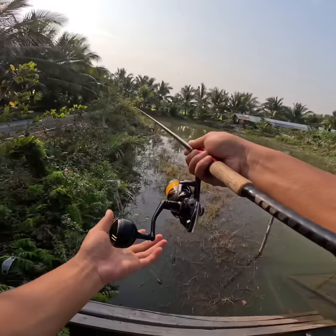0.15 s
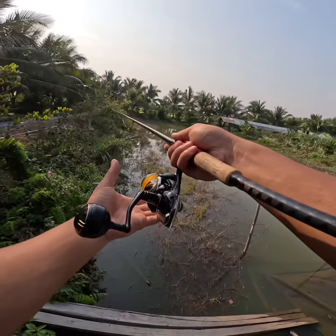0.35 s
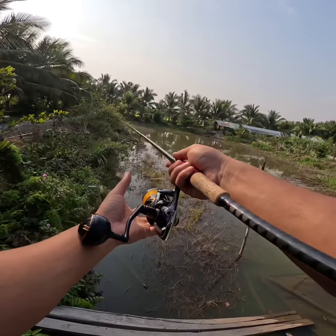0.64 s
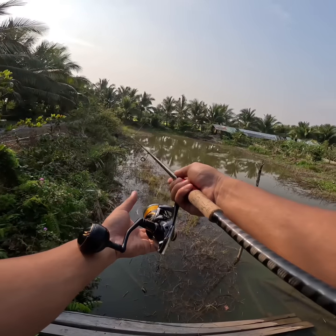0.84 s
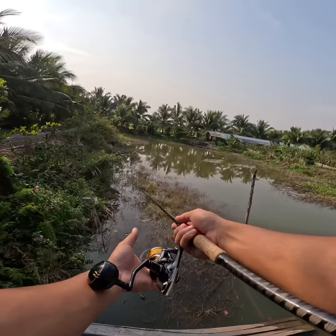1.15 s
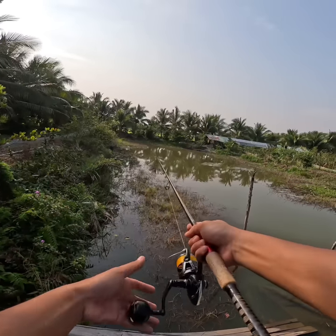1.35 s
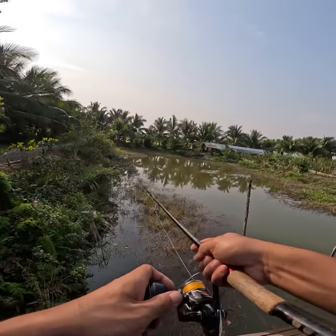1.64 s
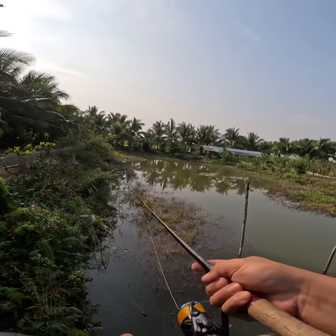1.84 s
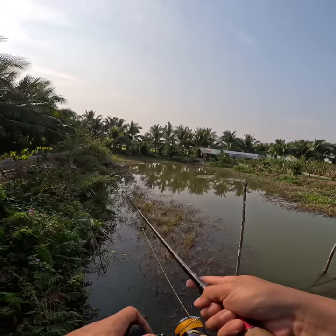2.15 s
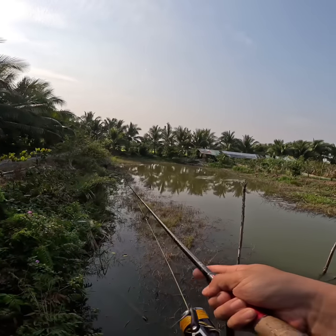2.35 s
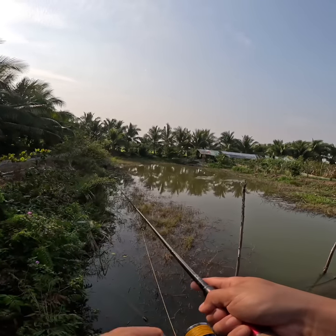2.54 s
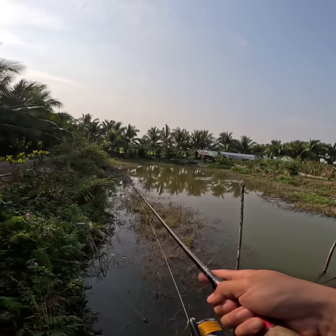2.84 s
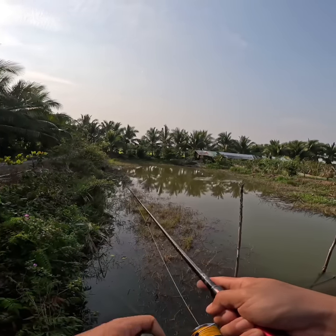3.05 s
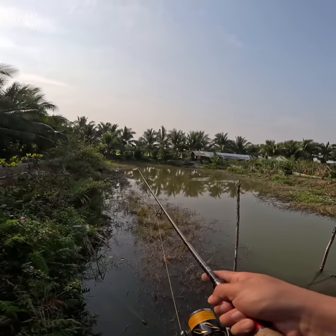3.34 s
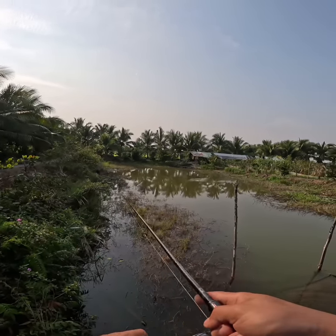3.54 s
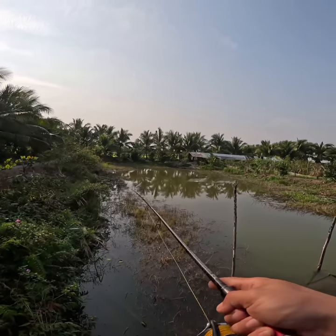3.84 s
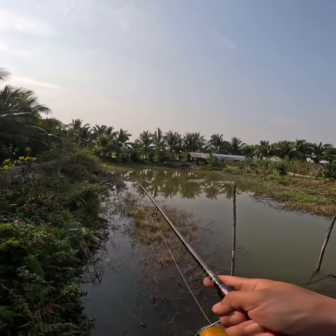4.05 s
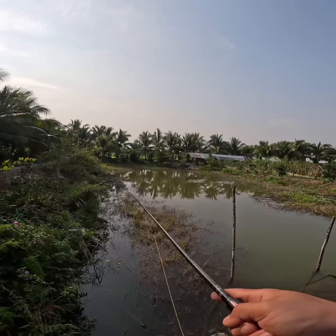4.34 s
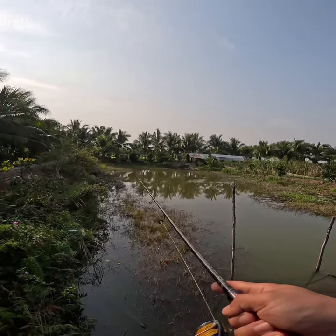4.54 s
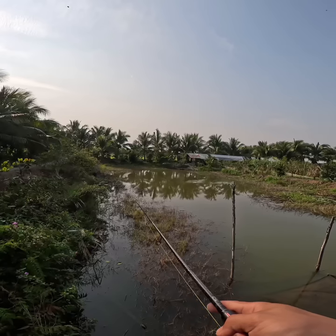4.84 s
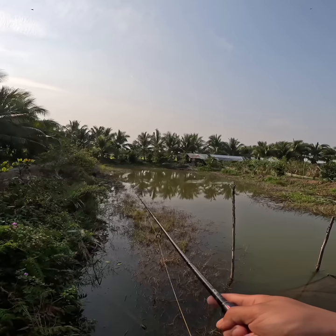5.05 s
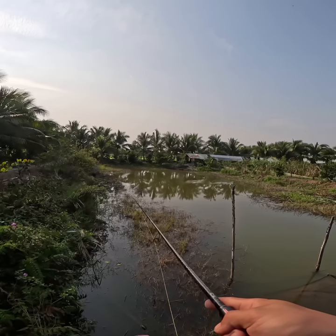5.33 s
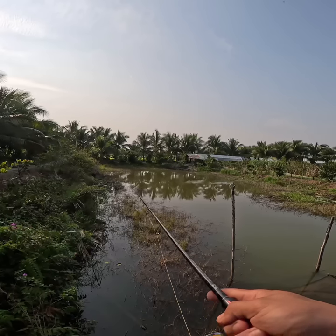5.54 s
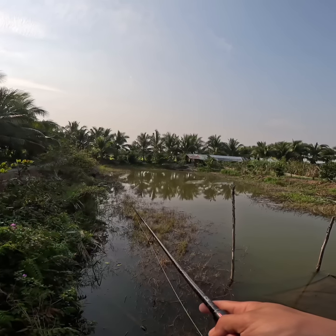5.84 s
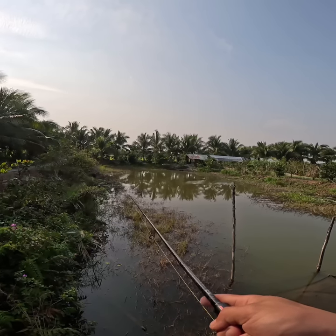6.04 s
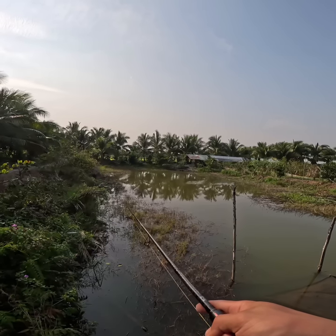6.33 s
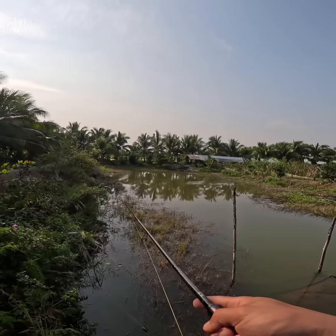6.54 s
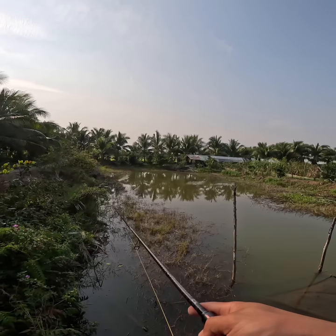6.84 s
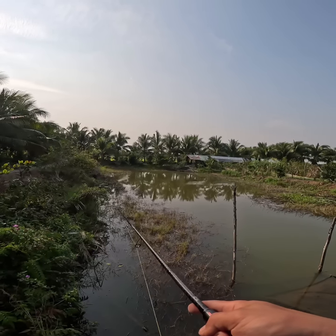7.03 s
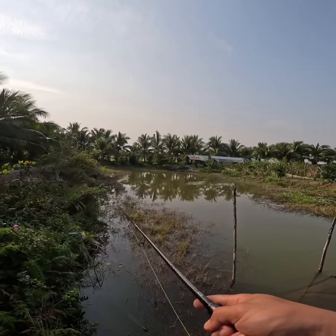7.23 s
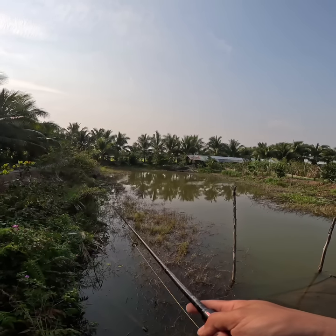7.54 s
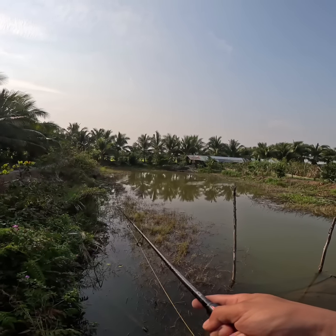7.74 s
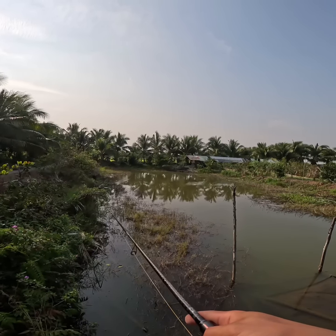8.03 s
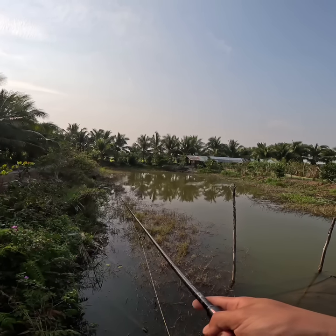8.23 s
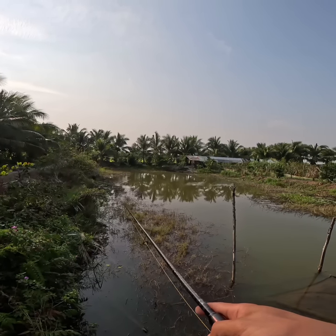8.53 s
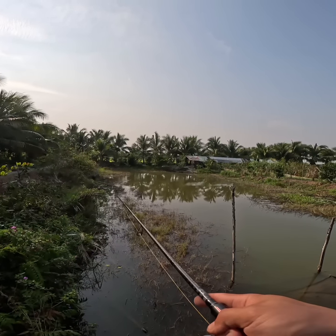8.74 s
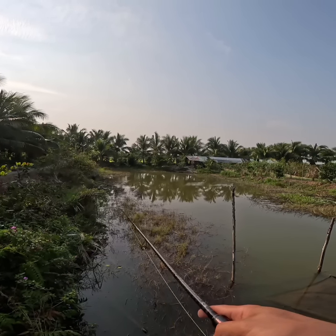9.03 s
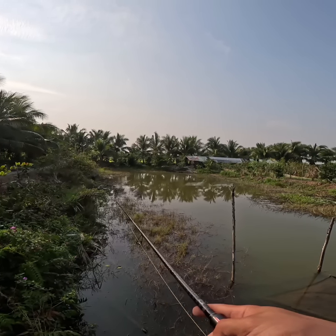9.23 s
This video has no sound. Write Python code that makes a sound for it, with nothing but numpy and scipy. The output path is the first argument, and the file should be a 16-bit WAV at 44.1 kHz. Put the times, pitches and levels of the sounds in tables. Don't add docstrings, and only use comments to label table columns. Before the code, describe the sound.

A rod swish and sinking line hiss, a sharp reel click, then wet line singing and ticking as the handle turns, with low wind thumps.

```python
import sys
import numpy as np
from scipy import signal
from scipy.fft import rfft, irfft, next_fast_len
from scipy.io import wavfile

SR = 44100
rng = np.random.default_rng(int(sys.argv[2]) if len(sys.argv) > 2 else 0)


def store_pcm(level_fs):
    pcm = np.round(np.clip(level_fs, -1, 1) * 32767).astype(np.int16)
    wavfile.write(sys.argv[1], SR, np.atleast_2d(pcm).T)


def undo_db(level):
    steps = np.asarray(level, float) / 20
    return 10 ** steps


N = 413658
FAST = next_fast_len(N)
BAIL_SHUT_S = 1.32
SWEEP_FADE_DB_PER_S = 45


def rms_one(x):
    return x / np.sqrt(np.mean(x ** 2) + 1e-20)


def in_time(rows, silent_db=-120):
    s, *columns = np.transpose(rows)
    t = np.arange(N) / SR
    return [np.interp(t, s, c) for c in columns[:-1]] + [np.interp(t, s, columns[-1], silent_db, silent_db)]


def at_hz(points, hz):
    table_hz, values = np.transpose(points)
    return np.interp(np.log(hz), np.log(table_hz), values)


def peak_db(s, db, rise, fall):
    t = np.arange(N) / SR - s
    return db + np.minimum(rise * t, -fall * t)


def drift(rate):
    r = np.exp(-80 * np.pi * rate / SR)
    white = rng.standard_normal(N // 40 + 2002)
    slow = signal.lfilter([1], [1, -2 * r, r * r], white)[2000:]
    return np.interp(np.arange(N) / 40, np.arange(len(slow)), rms_one(slow))


# (frequency [Hz], likeness [0-1])
EAR_LIKENESS = [(10, 0.66), (100, 1), (290, 0.39), (640, 0.44), (1400, 0.83), (3100, 0.77), (7000, 1),
                (15000, 0)]


def coloured(spectrum, source=None):
    hz = np.arange(FAST // 2 + 1) * SR / FAST + .1
    alike = np.clip(at_hz(EAR_LIKENESS, hz), 0, 1)
    if source is None:
        mid, side = rng.standard_normal((2, len(hz), 2)) @ [1, 1j]
    else:
        mid, side = rfft(source, FAST)
    pair = np.sqrt(1 + alike) * mid + np.sqrt(1 - alike) * side * [[1], [-1]]
    return rms_one(irfft(pair * undo_db(spectrum(hz)), FAST)[:, :N])


def closed(points):
    (low_hz, low_db), (high_hz, high_db) = points[0], points[-1]
    return lambda hz: at_hz([(low_hz / 4, low_db - 50), *points, (high_hz * 8, high_db - 150)], hz)


def singing(hz, width_hz, size=1):
    slow = rng.standard_normal((2, N // size + 2))
    slow = signal.sosfilt(signal.butter(2, width_hz / 2, fs=SR / size, output="sos"), slow)
    a, b = [np.interp(np.arange(N) / size, np.arange(len(v)), v) for v in slow]
    turn = (2 * np.pi * (np.cumsum(hz + np.zeros(N)) / SR % 1)).astype(np.float32)
    return rms_one(a * np.cos(turn) + b * np.sin(turn))


def add(out, s, x):
    i = round(s * SR)
    out[..., i:i + x.shape[-1]] += x[..., :N - i]


def decaying(hz, t60, rise_s=0.0002):
    t = np.arange(int(t60 * SR) + 9) / SR
    return np.sin(2 * np.pi * hz * t) * undo_db(-60 * t / t60) * (1 - np.exp(-t / rise_s))


def crack(t60, low_hz, high_hz):
    burst = rng.standard_normal(4000) * undo_db(-60 * np.arange(4000) / SR / t60)
    band = signal.butter(2, [low_hz, min(high_hz, .45 * SR)], "band", fs=SR, output="sos")
    return 0.5 * signal.sosfilt(band, burst)


# (time [s], level [dB])
BREEZE = [(0, -32), (.3, -33.5), (.5, -23), (1.2, -29.5), (1.8, -28.5), (2.9, -33.5), (3.8, -28),
          (4.7, -31.5), (5.75, -36), (6.2, -32.5), (8.4, -37), (9.38, -30)]
# (peak time [s], rumble level [dB], flutter level relative to rumble [dB])
GUSTS = [(.48, -32, -34), (0.779, -20, -43), (1.2, -22, -21), (1.44, -19, -18.5), (1.551, -16, -13.5),
         (1.9, -27, -6.5), (2.01, -23.5, -9), (2.48, -22, -24), (3.309, -15.5, -26), (3.6, -30.5, -3.5),
         (3.71, -18.5, -22.5), (3.97, -30, -22), (4.311, -12.5, -30), (4.47, -22, -26), (4.8, -31, -28),
         (5.09, -27.5, -14), (6.14, -23, -27), (6.32, -26, -17), (7.28, -24.5, -21), (7.75, -27, -28),
         (8.18, -33, -9), (8.68, -31, -13)]
# (frequency [Hz], level per Hz [dB])
RUMBLE_COLOUR = [(22, -6.5), (40, 3), (65, -5.5), (100, -9.5), (160, -27), (260, -33)]
# (frequency [Hz], level per Hz [dB])
FLUTTER_COLOUR = [(110, 6.5), (160, 2), (240, -3.5), (340, -3.5), (480, -15), (900, -61)]


def wind():
    breeze_db, = in_time(BREEZE)
    sweep_db = -SWEEP_FADE_DB_PER_S * np.arange(N) / SR
    rumble_db = breeze_db
    flutter_db = -49 + 0.27 * (breeze_db - breeze_db.mean())
    flutter_db = np.maximum(flutter_db, -29.5 + sweep_db)
    for s, db, rel_db in GUSTS:
        gust_db = peak_db(s, db, rise=279, fall=150)
        rumble_db = np.maximum(rumble_db, gust_db)
        flutter_db = np.maximum(flutter_db, gust_db + rel_db)
    lumps_db = 2.5 * drift(18).clip(-3, 1.5)
    swell_db = np.maximum(breeze_db + 4.5, -14 + sweep_db)
    swell = coloured(closed([(3, 0), (27, -3)])) * undo_db(swell_db)
    rumble = coloured(closed(RUMBLE_COLOUR)) * undo_db(rumble_db + lumps_db)
    flutter_lumps_db = 2.43 * drift(29.5).clip(-3, 1.5)
    flutter = coloured(closed(FLUTTER_COLOUR)) * undo_db(flutter_db + flutter_lumps_db)
    return swell + rumble + flutter


# (frequency [Hz], level per Hz [dB])
SWISH_COLOUR = [(150, -23), (250, -3), (1070, -8.5), (1270, -4.5), (1700, -1.5), (2800, -6), (5680, -5.5),
                (9220, -9.5), (13200, -10), (15500, -29)]


def swish():
    t = np.arange(N) / SR
    after_s = t - BAIL_SHUT_S
    level_db = np.maximum(-30.5 - 14.5 * t, -45)
    level_db = level_db - (600 * after_s).clip(0, 24) - 60 * after_s.clip(0)
    return coloured(closed(SWISH_COLOUR)) * undo_db(level_db)


def rod_whoosh():
    t = np.arange(N) / SR
    return singing(600, width_hz=340, size=8) * undo_db(-35.5 - SWEEP_FADE_DB_PER_S * t)


# (time [s], hiss level [dB], hiss centre [Hz])
LINE_RUN = [
    (0, -41, 7500),
    (.15, -32, 8910),
    (.45, -27.5, 8700),
    (.6, -29.5, 7440),
    (0.901, -32.5, 6760),
    (1.3, -32, 6540),
    (1.36, -64, 6060),
]
# (pitch [Hz], width [Hz], level [dB])
GUIDE_RINGS = [(3754, 670, -14.5), (5550, 1900, -10)]
# (pitch [Hz], width [Hz], level [dB], fade [dB per s])
TIP_RING = (5749.5, 200, -6, 7)


def running_line():
    t = np.arange(N) / SR
    centre_hz, hiss_db = in_time([(s, hz, db) for s, db, hz in LINE_RUN])
    hiss = singing(centre_hz, width_hz=3000) * undo_db(-2.5 + 2.1 * drift(130) + 0.57 * drift(8.4))
    for hz, width, db in GUIDE_RINGS:
        hiss = hiss + undo_db(db + 2.0 * drift(27)) * singing(hz, width, size=8)
    hz, width, db, fade = TIP_RING
    hiss = hiss + undo_db(db - fade * t + 2.4 * drift(30)) * singing(hz, width, size=8)
    no_lows = signal.butter(4, 3300, "high", fs=SR, output="sos")
    return signal.sosfilt(no_lows, hiss) * undo_db(hiss_db)


# (time [s], peak level [dB], crack level relative to it [dB])
BAIL_HITS = [(0.002, -20.5, 0), (0.023, -20, -7), (0.0812, -18.5, -5), (1.2615, -26.5, 13),
             (1.281, -21, 13), (1.3105, -2, 11), (1.322, -16, 0), (1.329, -23, -20), (1.3385, -25, -27),
             (1.3544, -22, -16), (1.415, -37, 22), (1.4604, -43, 32), (1.4915, -29, 0.5),
             (1.4947, -16.5, -2), (1.504, -31, 16), (1.589, -40, 15)]
# (pitch [Hz], level [dB], time to die by 60 dB [s])
REEL_MODES = [(1150, -15, 0.025), (1660, -5.5, 0.012), (2130, 5, 0.015), (4670, -14, 0.03),
              (5570, -8.5, 0.017)]
# (pitch [Hz], level [dB], time to die by 60 dB [s])
WIRE_RING = [(2150, -23, 0.13), (5600, -21, 0.074)]


def bail():
    out = np.zeros(N)
    for s, db, crack_db in BAIL_HITS:
        uneven_db = rng.normal(0, 1.5, len(REEL_MODES))
        for (hz, level_db, t60), u in zip(REEL_MODES, uneven_db):
            add(out, s, undo_db(db + level_db + u) * decaying(hz, t60))
        add(out, s, undo_db(db + crack_db - 2.5) * crack(0.0099, 1250, 6800))
    for hz, db, t60 in WIRE_RING:
        add(out, BAIL_SHUT_S, undo_db(db) * decaying(hz, t60, rise_s=0.0027))
    return out


# (time [s], peak level [dB])
COIL_SLAPS = [(0.3362, -27), (0.5023, -27), (0.5358, -25), (0.5847, -33), (0.5962, -29), (0.6101, -26),
              (0.621, -20.5), (0.667, -24), (0.6884, -27), (0.7144, -30), (0.8084, -25.5), (0.8612, -32),
              (0.874, -28), (0.9159, -27), (1.093, -31), (1.11, -28), (1.148, -38), (1.1865, -34)]


def coil_slaps():
    out = np.zeros(N)
    for s, db in COIL_SLAPS:
        add(out, s, undo_db(db) * decaying(3630, 0.027))
        add(out, s, undo_db(db + 12.5) * crack(0.012, 3400, 6300))
    return out


# (time [s], level [dB], pitch [Hz], push 1 or suck -1)
AIR_THUMPS = [(0.481, -3, 36, 1), (0.636, -9.5, 40.2, 1), (0.704, -3.5, 48, 1), (0.77, 3.5, 48.3, 1),
              (1.056, -1, 48, -1), (1.088, -2.5, 42.1, 1), (1.149, -1.5, 42, 1), (1.173, -5, 40, -1),
              (1.187, -3, 45.3, 1), (1.212, -1, 31.8, 1), (1.274, -8, 40, 1), (1.526, -0.5, 33, -1),
              (1.539, 0, 35, 1), (1.906, -6, 35.8, 1), (1.975, -3.5, 38.6, 1), (2.474, -8.5, 36, 1),
              (3.225, -6, 56, 1), (3.302, -13, 45, 1), (3.321, -11, 42.2, 1), (3.713, -16, 45, 1),
              (3.755, -8.5, 42, 1), (3.979, -11, 26, 1), (4.284, 4.5, 61.2, -1), (4.324, -4.5, 36.5, 1),
              (4.338, -7, 48, -1), (4.361, -7, 50, 1), (4.423, -5, 41.7, -1), (4.457, 5, 63, -1),
              (4.816, -6.5, 34, 1)]


def wind_thumps():
    out = np.zeros((2, N))
    soft = signal.butter(2, 170, fs=SR, output="sos")
    for s, db, hz, push in AIR_THUMPS:
        puff = signal.sosfilt(soft, decaying(1.146 * hz, 2.6 / hz, rise_s=0.0021))
        sides = undo_db(rng.normal(0, 2.9) * np.array([[1], [-1]]))
        add(out, s, np.sign(push) * undo_db(db) * 0.9 * puff * sides)
    return out


# (time [s], level [dB], low edge [Hz], high edge [Hz], time to die by 60 dB [s])
SNAP_EDGES = [
    (.5598, -25, 5400, 15500, 0.0073),
    (1.2797, -4, 4600, 11000, 0.0041),
    (1.312, -10, 3000, 10000, 0.0036),
    (1.4955, -12, 3300, 6400, .014),
]


def snap_edges():
    out = np.zeros(N)
    for s, db, low_hz, high_hz, t60 in SNAP_EDGES:
        add(out, s, undo_db(db + 13.0) * crack(t60, low_hz, high_hz))
    return out


# (time [s], level [dB], top frequency [Hz], fade [dB per s])
RATTLES = [
    (1.301, -20.5, 8950, 902),
    (1.315, -26.5, 6477, 290),
    (1.495, -26, 4920, 902),
]


def rattle():
    t = np.arange(N) / SR
    levels_db = np.array([peak_db(s, db, 9020, fade) for s, db, _, fade in RATTLES])
    tops_hz = np.array([top_hz - 39000 * (t - s).clip(0) for s, _, top_hz, _ in RATTLES]).clip(300)
    loudest = levels_db.argmax(axis=0)[None]
    top_hz = np.take_along_axis(tops_hz, loudest, axis=0)[0]
    buzz = singing(400 + top_hz / 2, width_hz=7400)
    buzz = buzz + undo_db(-0.5) * singing(1900, width_hz=770, size=8)
    buzz = signal.sosfilt(signal.butter(2, 8000, fs=SR, output="sos"), buzz)
    return buzz * undo_db(levels_db.max(axis=0).clip(-200) + 3.6 * drift(120))


# (time [s], level [dB])
SPRING_SQUEAK = [
    (1.34, -56),
    (1.37, -45),
    (1.455, -46),
    (1.485, -50),
    (1.5, -65),
]


def spring_squeak():
    turn = 2 * np.pi * 4054 * np.arange(N) / SR
    level_db, = in_time(SPRING_SQUEAK)
    return (np.sin(turn) + undo_db(-13) * np.sin(2 * turn)) * undo_db(level_db + 0.86 * drift(40))


def patchy(patch_db):
    white = rng.standard_normal((2, 2, N)) * undo_db(1.7 * np.minimum(rng.exponential(1, N), 6))
    edges = np.geomspace(300, 17000, 10)
    out = 0
    for k, pair in enumerate(zip(edges, edges[1:])):
        band = signal.butter(2, pair, "band", fs=SR, output="sos")
        out = out + signal.sosfilt(band, white[k % 2]) * undo_db(patch_db * drift(11.4))
    return out


def crackle(per_s):
    out, length_s = np.zeros(N), 7.7
    for when, pitch, size in rng.random((int(per_s * length_s), 3)):
        hz = 550 * (6000 / 550) ** pitch
        db = -4.5 * np.log(size + 0.022) - 1.2 * np.log2(hz / 550)
        add(out, 1.65 + length_s * when, undo_db(db) * decaying(hz, 14 / hz + 0.011))
    return out


# (time [s], level [dB])
CRANK_EFFORT = [(1.36, -49), (1.57, -53), (1.72, -45.5), (1.88, -40.5), (3.34, -41.5), (3.51, -37),
                (3.6, -43.5), (3.76, -39), (4.3, -41), (5.3, -42.5), (6.26, -42), (6.89, -40), (7.5, -41.5),
                (7.95, -44.5), (8.2, -38), (8.5, -43.5), (8.75, -38.5), (9.38, -42.5)]
# (frequency [Hz], level per Hz [dB])
GEAR_COLOUR = [(250, -40), (420, -11.5), (561, -15), (931, -10), (1310, -2), (1840, -7.5), (3400, -21.5),
               (4420, -88)]
# (frequency [Hz], level per Hz [dB])
RUB_COLOUR = [(1410, -22), (2400, -2.5), (2660, 0), (3920, -1.5), (5610, -2), (6560, -6.5), (7320, -5),
              (8760, -13), (12600, -22), (14900, -21.5), (15500, -67)]
# (pitch [Hz], width [Hz], level [dB])
HOLLOW_PARTS = [(565, 130, -15), (750, 55, -16), (1322, 270, -7.5), (1565, 177, -10.5), (2150, 160, -14),
                (2650, 53, -19), (5620, 260, -20.5), (7210, 310, -17)]


def crank():
    effort_db, = in_time(CRANK_EFFORT)
    ends = [s for s, _, _ in ROLLER_CLIMBS[1:]]
    climbing = np.max([peak_db(s, 5, rise=68, fall=17.7) for s in ends], axis=0).clip(0)
    slipped = np.max([peak_db(s + 0.0072, 5, rise=140, fall=20) for s in ends], axis=0).clip(0)
    rub_db = -44.5 + 0.7 * (effort_db + 41.5) + climbing - slipped
    load = undo_db(0.77 * drift(28) + 1.2 * drift(22)) * (effort_db > -110)
    grit = patchy(patch_db=2.5)
    gears = coloured(closed(GEAR_COLOUR), grit) * undo_db(effort_db - 5.0)
    rub = coloured(closed(RUB_COLOUR), grit) * undo_db(rub_db)
    hollows = 0
    for hz, width, db in HOLLOW_PARTS:
        part_db = db + 3.6 * drift(15.7).clip(-3, 1.6)
        hollows = hollows + undo_db(part_db) * singing(hz + 60 * drift(5), width, size=8)
    fits_db = 4 * drift(10).clip(-3, 1.5)
    slack_hz = 2150 * undo_db(.5 * drift(3))
    waver = undo_db(-15 + fits_db) * singing(slack_hz, width_hz=150, size=8)
    ringing = load * (hollows + waver) + undo_db(-2.0) * crackle(per_s=33)
    return load * (gears + rub), ringing * undo_db(effort_db)


# (time [s], level [dB], pitch [Hz])
LIGHT_TAPS = [(1.386, -39, 6000), (1.395, -35, 5770), (1.9188, -20, 1880), (2.0371, -31, 4890),
              (2.1598, -33.5, 5620), (2.3923, -32, 5270), (2.7589, -27, 5050), (2.8727, -23, 2050),
              (2.952, -22, 2080), (3.0812, -26, 2200), (3.168, -31, 2760), (3.5062, -22, 3940),
              (3.5062, -18, 4830), (3.538, -18.5, 3740), (3.7621, -23.5, 3140), (3.9014, -16, 4800),
              (3.9668, -21, 3730), (4.364, -32, 4800), (4.4828, -26, 2720), (4.931, -32, 4140),
              (5.0946, -31, 4300), (5.1211, -34, 5260), (5.2712, -31, 1870), (5.3685, -22, 1930),
              (5.6065, -27, 2106), (5.7042, -31, 5500), (5.724, -25, 4270), (5.9093, -27, 1400),
              (5.9432, -32, 1500), (6.2255, -30, 5030), (6.3722, -32, 5000), (6.4183, -34, 4010),
              (6.6082, -29, 5270), (6.702, -28, 1980), (6.87, -20, 1366), (6.9045, -31, 7230),
              (7.6094, -28, 2070), (8.2874, -30, 4380), (8.31, -29, 6200), (8.4779, -27.5, 6500),
              (8.7287, -20, 1762), (8.8526, -31, 5170), (9.0701, -32, 5160), (9.2741, -31, 1876)]


def taps():
    out = np.zeros(N)
    for s, db, hz in LIGHT_TAPS:
        add(out, s, undo_db(db - 1.5) * decaying(hz, 0.016, rise_s=0.00044))
        add(out, s, undo_db(db + 6.5) * crack(0.018, hz / 1.4, hz * 1.4))
    return out


# (time [s], level [dB], pitch [Hz])
HANDLE_PINGS = [(1.494, -18.5, 1445), (1.4945, -26, 3760), (1.6371, -29, 2130), (1.8696, -23.5, 2195),
                (2.9806, -31, 1360), (2.9819, -27, 2100), (4.18, -25.5, 1400), (4.178, -28, 2510),
                (3.5064, -26, 1080), (3.902, -32, 1270), (4.0594, -28, 1310), (6.0032, -27.5, 1300),
                (7.0653, -21, 1990), (8.0381, -27, 2085), (8.1972, -25, 1350), (8.508, -21, 1370),
                (8.994, -23, 1309)]


def pings():
    out = np.zeros(N)
    for s, db, hz in HANDLE_PINGS:
        add(out, s, undo_db(db + 2.5) * decaying(hz, 0.029, rise_s=0.00043))
    return out


# (time [s], level [dB], pitch [Hz])
ROD_KNOCKS = [(1.497, -32, 820), (1.51, -24.5, 584), (2.122, -36, 626), (2.707, -29, 770),
              (2.952, -36, 760), (3.17, -33, 620), (3.219, -32, 750), (3.26, -33, 754), (3.507, -29.5, 650),
              (3.906, -23, 560), (4.208, -30.5, 640), (4.405, -31.5, 690), (5.911, -31, 636),
              (5.943, -27, 565), (6.003, -31, 565), (6.048, -32, 750), (6.871, -31, 614),
              (8.003, -35.5, 670), (8.127, -30.5, 720), (8.369, -31.5, 569), (8.48, -33, 651),
              (8.543, -26.5, 887), (8.693, -29, 890), (8.763, -29, 575)]


def knocks():
    out = np.zeros(N)
    for s, db, hz in ROD_KNOCKS:
        add(out, s, undo_db(db) * decaying(hz, 0.058, rise_s=0.0024))
        add(out, s, undo_db(db + 9.5) * crack(0.16, 365, 1530))
    return out


# (end time [s], length [s], level [dB])
ROLLER_CLIMBS = [(1.75, .12, -52), (2.71, .17, -51), (3.5, .13, -49), (4.14, .11, -47), (4.87, .11, -46),
                 (5.61, .15, -47), (6.31, .13, -48), (7.06, .13, -45), (7.82, .1, -55), (8.49, .09, -44),
                 (9.22, .12, -45)]


def roller_climbs():
    rows = []
    for s, length, db in ROLLER_CLIMBS:
        start, low_hz = s - length, 6250 - 16000 * length
        rows += [(start - .02, low_hz, -90), (start, low_hz, db - 4),
                 (s - .02, 6250 - 0.028 * 16000, db),
                 (s, 6250, db - 4), (s + 0.016, 6250, -90)]
    hz, db = in_time(rows)
    return singing(hz, width_hz=450, size=4) * undo_db(db + 1.5 + 2.2 * drift(60))


# (time [s], length [s], pitch [Hz], level [dB])
FIRST_PULL = (1.635, .14, 1500, -43)
# (time of lowest pitch [s], fall [s], rise [s], lowest pitch [Hz], level [dB])
TIP_DIPS = [
    (2.29, 0.17, .03, 1696, -45),
    (2.549, 0.12, 0.038, 2300, -45.5),
    (4.081, 0.081, 0.15, 2150, -54),
    (5.33, 0.085, 0.13, 1810, -45),
    (6.44, .01, 0.12, 1723, -49),
    (6.76, 0.088, 0.13, 2040, -38.5),
    (7.84, 0.16, 0.092, 1550, -42),
    (8.53, .14, 0.31, 1300, -40),
    (9.2, .14, 0.13, 1553, -38.5),
]


def taut_line():
    t, edge_s, taut_hz = np.arange(N) / SR, 0.038, 2350
    hz, level = np.full(N, float(taut_hz)), np.zeros(N)
    for s, fall, rise, low_hz, db in TIP_DIPS:
        away = np.maximum((s - t) / fall, (t - s) / rise).clip(0, 1)
        hz -= (taut_hz - low_hz) * (1 - away ** 2.2)
        level += undo_db(db) * (np.minimum(t - s + fall, s + rise - t) / edge_s).clip(0, 1)
    s, length, pull_hz, db = FIRST_PULL
    pull_edge = (np.minimum(t - s, (s + length - t) / 2) / edge_s).clip(0, 1)
    pull = singing(pull_hz, width_hz=290, size=8) * undo_db(db) * pull_edge
    stutter_db = 3 * drift(40).clip(-3, 1.2)
    song = singing(hz * undo_db(.15 * drift(24.98)), width_hz=190, size=8)
    return pull + song * level * undo_db(stutter_db)


# (middle time [s], level [dB])
CHEEPS = [(1.816, -34), (2.043, -36), (2.272, -38), (2.499, -32), (2.731, -36), (2.949, -35), (3.178, -35),
          (3.407, -34), (3.635, -37), (3.85, -39), (4.073, -44), (4.306, -33), (4.527, -36), (4.753, -36),
          (4.972, -45), (5.2, -38), (5.418, -40), (5.649, -37), (5.866, -39), (6.094, -36), (6.311, -33),
          (6.528, -36), (6.746, -40), (6.971, -44), (7.179, -37), (7.39, -49)]


def chick():
    out, t = np.zeros(N), np.arange(1700) / SR
    for (s, db), (shift, bend) in zip(CHEEPS, rng.standard_normal((len(CHEEPS), 2))):
        pitch_hz = 4070 + 60 * shift - (19000 + 3000 * bend) * t
        whistle = np.sin(2 * np.pi * np.cumsum(pitch_hz) / SR) * np.hanning(len(t))
        add(out, s - t[-1] / 2, undo_db(db - 7.0) * whistle)
    hoarse_db = 7 * drift(300).clip(-3, 1.5)
    return out * undo_db(hoarse_db)


# (time [s], level [dB], pitch [Hz], low part relative to it [dB])
REEL_TICKS = [(1.7996, -26.5, 5950, -7), (2.1116, -28, 2950, -12), (2.247, -26, 3190, -7),
              (2.419, -25, 2540, -6), (3.5063, -23, 2970, -27), (3.5378, -22, 4570, -14),
              (3.6617, -28, 5020, -22), (3.902, -19, 2970, -13), (3.9658, -28, 4440, -18),
              (5.3224, -27.5, 3080, -22), (5.388, -28.5, 3200, -21), (5.6717, -26.5, 6340, -4),
              (6.0905, -30, 3470, -9), (6.1788, -21, 4080, -29), (6.272, -28, 4140, -18),
              (6.3447, -29, 4960, -19), (6.5273, -34, 3700, -1), (6.734, -28, 3125, 0.5),
              (7.6405, -24, 3660, -14), (7.7386, -28, 4000, -21), (8.1252, -28, 5900, -13),
              (8.1967, -31, 2540, -10), (8.277, -28, 2680, -11), (8.7595, -28, 5600, -15),
              (9.3262, -24.5, 2960, -3.5)]


def ticks():
    out = np.zeros(N)
    for s, db, hz, low_db in REEL_TICKS:
        add(out, s, undo_db(db - 7) * crack(0.0022, 5000, 12700))
        add(out, s, undo_db(db - 3) * decaying(hz, 0.022))
        add(out, s, undo_db(db + 9.5) * crack(0.0084, hz / 1.33, hz * 1.28))
        for housing_hz in (3000, 4750, 7100):
            add(out, s, undo_db(db - 8.5) * decaying(housing_hz, 0.011))
        add(out, s, undo_db(db + low_db + 18.0) * crack(0.018, 880, 3000))
    return out


# (start time [s], length [s], first pitch [Hz], last pitch [Hz], level [dB])
SONG_SCRAPS = [(1.8, 0.26, 2150, 2150, -47), (1.818, 0.12, 3010, 3070, -45),
               (2.131, 0.046, 1940, 1780, -44), (2.462, 0.092, 2770, 2350, -42),
               (3.217, 0.06, 2580, 2440, -45.5), (3.332, 0.12, 2350, 2230, -40),
               (3.704, .11, 2840, 2620, -40.5), (3.747, 0.043, 5600, 5700, -41.5),
               (3.988, 0.029, 2590, 2500, -45), (4.131, 0.076, 2550, 2720, -47),
               (4.19, 0.085, 2350, 2320, -43), (4.46, 0.07, 2750, 2620, -43),
               (4.55, 0.032, 2600, 2300, -49), (4.602, .05, 2750, 2760, -50),
               (4.903, 0.034, 1150, 2170, -41), (4.952, 0.17, 2550, 2390, -44.5),
               (5.17, 0.077, 2260, 2070, -42.5), (5.461, 0.15, 2105, 2090, -46.5),
               (6.502, 0.077, 2000, 2400, -41), (7.239, .09, 2150, 1780, -42.5),
               (7.33, 0.067, 1850, 1750, -48), (8.0, .05, 2590, 2050, -53), (8.033, .37, 2047, 2174, -43),
               (8.205, .04, 2550, 2150, -45), (8.26, 0.062, 2700, 2180, -45),
               (8.37, 0.048, 2510, 2115, -50), (8.65, 0.047, 2670, 2910, -58), (8.69, .1, 1550, 2150, -45),
               (8.849, .22, 2270, 2150, -46), (9.3, 0.024, 2300, 3160, -53),
               (9.323, 0.046, 2300, 2250, -36)]


def wisps():
    out = np.zeros(N)
    rough = singing(0, width_hz=220, size=8) * undo_db(2.5 * drift(35).clip(-2, 1.3))
    for s, length, first_hz, last_hz, db in SONG_SCRAPS:
        t = np.arange(int(length * SR)) / SR
        turn = 2 * np.pi * np.cumsum(first_hz + (last_hz - first_hz) * t / length) / SR
        edge = (np.minimum(t, length - t) / 0.0045).clip(0, 1)
        i = min(int(s * SR), N - len(t))
        add(out, s, undo_db(db + 2.5) * edge * np.sin(turn) * rough[i:i + len(t)])
    return out


def near_echoes(x, echo_db):
    out = np.array([x, x])
    for k, lag_s in enumerate([.0004, .0007, .0013, .0019, .0031, .0043]):
        add(out[k % 2], lag_s, undo_db(echo_db - 5.6 * k) * x * (-1) ** (k // 2))
    return out


def scene():
    line = running_line() + rod_whoosh() + coil_slaps()
    grit, hollows = crank()
    snaps = bail() + snap_edges() + rattle() + spring_squeak()
    small_hits = taps() + pings() + knocks() + ticks()
    songs = roller_climbs() + taut_line() + wisps()
    points = near_echoes(line + hollows + snaps + small_hits + songs, echo_db=-25.0)
    spread = undo_db(-11) * np.roll(line + hollows, 1100) * [[1], [-1]]
    air = wind() + wind_thumps() + swish()
    return air + grit + points + spread + chick() * undo_db([[1.5], [-1.5]])


# (frequency [Hz], left minus right [dB])
SIDE_TILT = [(10, -3.5), (30, -5), (90, 0), (250, -5.5), (600, -2), (2500, -0.3), (6000, 0), (13000, 4)]
# (frequency [Hz], left leads by [radians])
SIDE_LEAD = [(20, -0.36), (1200, -0.39), (2240, -0.57), (3270, -1.09), (4400, -0.094), (7000, -0.68),
             (13000, -0.38)]


def microphones(dry):
    hz = np.arange(FAST // 2 + 1) * SR / FAST + .1
    half = undo_db(at_hz(SIDE_TILT, hz) / 2) * np.exp(.5j * at_hz(SIDE_LEAD, hz))
    sides = irfft(rfft(dry, FAST) * [half, 1 / half], FAST)[:, :N]
    top_cut = signal.cheby2(12, 60, 16100, fs=SR, output="sos")
    return signal.sosfilt(top_cut, np.clip(sides, -1, 1))


def band_limit(x):
    return signal.sosfilt(signal.butter(12, 15620, fs=SR, output="sos"), x)


def record(dry):
    mix = microphones(dry)
    return band_limit(mix)


dry = scene()
out = record(dry)
store_pcm(out)
```